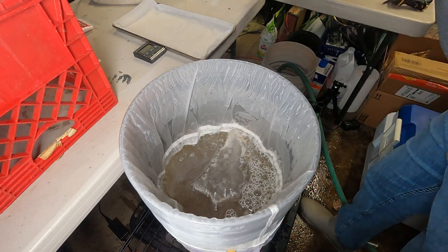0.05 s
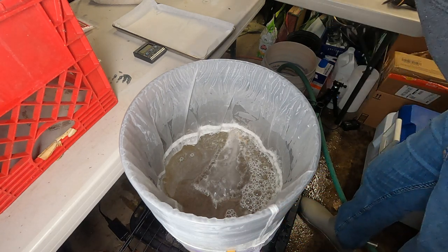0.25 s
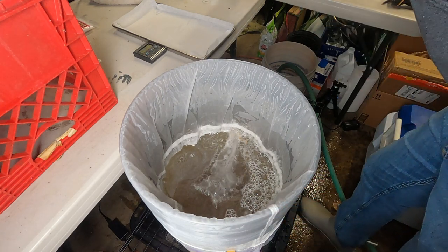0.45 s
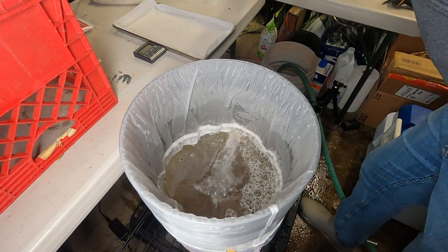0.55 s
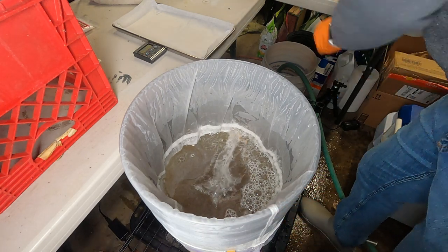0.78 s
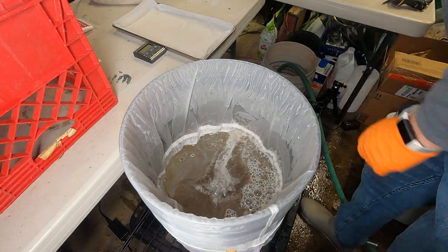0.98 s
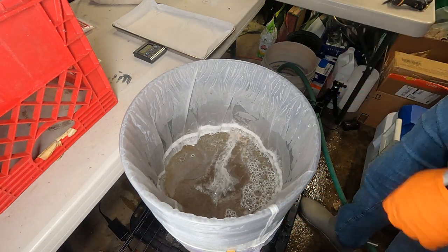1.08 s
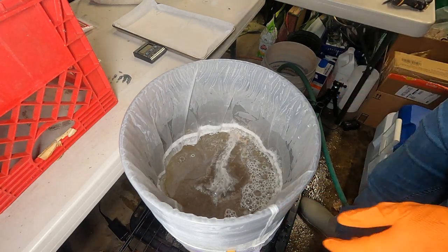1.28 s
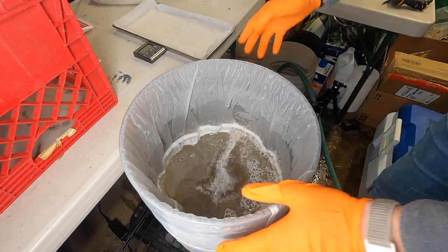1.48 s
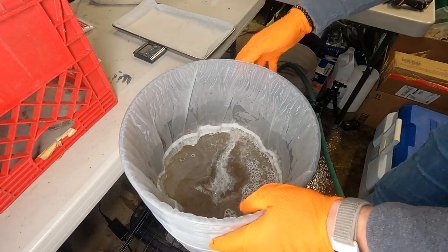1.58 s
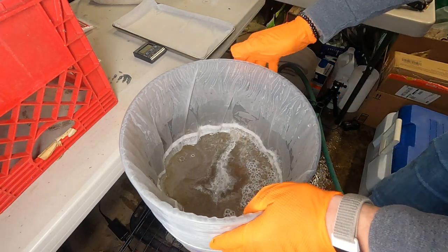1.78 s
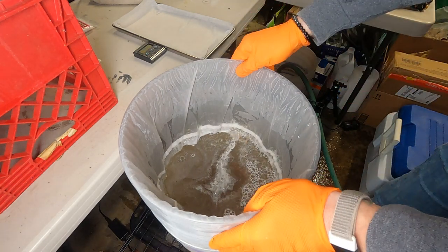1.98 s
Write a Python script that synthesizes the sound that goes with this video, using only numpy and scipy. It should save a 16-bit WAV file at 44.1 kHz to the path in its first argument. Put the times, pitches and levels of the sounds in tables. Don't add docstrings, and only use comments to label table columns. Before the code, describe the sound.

Water drips and drains through a mesh bag into a bucket: a few plinks and low glugs, one hollow bubbling slosh, then scattered bright drops over a faint trickle, heard close in a small shed.

```python
import sys
import numpy as np
from scipy import signal
from scipy.fft import rfft, irfft
from scipy.io import wavfile
from scipy.ndimage import uniform_filter1d

SR = 44100
rng = np.random.default_rng(int(sys.argv[2]) if len(sys.argv) > 2 else 0)


def convert_level_to_amplitude(level_db):
    exponent = np.asarray(level_db, float) / 20
    return 10 ** exponent


def digitize_waveform(pressure):
    field = np.atleast_2d(pressure).T
    bounded = np.clip(field, -1, 1)
    quanta = np.round(bounded * 32767).astype(np.int16)
    wavfile.write(sys.argv[1], SR, quanta)


N = 90404

# (frequency [Hz], level [dB per Hz])
AIR_SPECTRUM = [(30, 20), (110, -5.5), (400, 1.5), (2000, -6.5), (7000, -9.5), (13000, -20.5), (15600, -25),
                (16100, -48)]
AIR_DB, AIR_SIDE_DB = -68, -8.5
SETTLE_S, SETTLE_END_S, SETTLE_DB = 0.54, 1.206, -62
WALL_S, WALL_DB = 0.0068, -15
SHED_DB, SHED_T60_S, SHED_SIDE_GAIN = -6.5, 0.14, 0.24

# (frequency [Hz], level [dB per Hz])
TRICKLE_SPECTRUM = [(35, -78), (60, -39), (189, -0.5), (924, -2), (1620, 2.5), (4220, -16.5), (9790, -31.5),
                    (16000, -49.5)]
# (time [s], level [dB])
FLOW = [
    (0, -51.5),
    (.7, -57.5),
    (.95, -53),
    (1.3, -56),
    (1.45, -60),
    (1.75, -53.5),
    (2.05, -66),
]
HISS_DB, PATCH_DB, FLICKER_DB, FLICKER_HZ = -5, 2, 7.5, 7640
BEADS_PER_S, BEADS_DB, BEAD_SPREAD_DB = 400, -6, 2.5

# (frequency [Hz], level [dB per Hz])
CRACKLE_SPECTRUM = [(2500, 8.5), (5000, 2), (9000, -5.5), (15500, -17)]
CRACKLE_DB, CRACKLE_T60_S, CRACKLE_SHARE = -33.5, 0.078, 0.67

# (time [s], peak [dB], centre [Hz])
TICKS = [(.008, -37.5, 6930), (0.078, -45, 8340), (0.258, -36, 7270), (0.359, -46.5, 9250),
         (0.428, -38.5, 7600), (.458, -39, 6700), (0.491, -43, 9500), (0.559, -41, 8500),
         (0.56, -41, 10900), (0.612, -35.5, 10050), (0.612, -35.5, 13000), (0.618, -40, 6450),
         (.62, -53, 15000), (0.684, -44.5, 8470), (0.902, -38.5, 9100), (0.905, -52, 13500),
         (1.081, -63, 14400), (1.225, -61, 12000), (0.996, -54, 4400), (0.981, -44, 6600),
         (1.078, -45, 8700), (1.075, -39, 10830), (1.264, -41.5, 10550), (1.329, -45, 7020),
         (1.384, -43, 5880), (1.626, -43.5, 6600), (1.935, -47.5, 10250), (1.912, -48.5, 5550),
         (1.959, -44, 5200)]
TICK_T60_S, TICK_RISE_S, TICK_WIDTH, TICK_GRIT = 0.021, 0.003, 0.27, 0.45
# (time [s], peak [dB], pitch [Hz])
PIPS = [(0.818, -64, 7370), (0.828, -54, 7300), (.857, -64, 7190), (.903, -70, 13600), (0.911, -53, 7400),
        (1.038, -73, 7250), (1.04, -72, 10500), (1.129, -60, 7980), (1.224, -59, 7730), (1.245, -56, 7720),
        (1.301, -52.5, 4600), (1.329, -64.5, 12500), (1.369, -61, 7710), (1.41, -68, 10500),
        (1.459, -53.5, 5820), (1.46, -62, 12800), (1.474, -65, 9200), (1.517, -60, 7600),
        (1.523, -64, 9970), (1.556, -71, 12600), (1.643, -53, 7220), (1.675, -57, 8250), (1.811, -66, 7900),
        (1.871, -63, 6780)]
PIP_T60_S, PIP_SPREAD = 0.0095, 0.042
# (time [s], peak [dB], pitch [Hz])
THUDS = [
    (0.039, -37, 207),
    (1.645, -49.5, 265),
    (1.669, -52.5, 420),
    (1.933, -44, 608),
]
THUD_T60_S, THUD_RISE_S = 0.14, 0.0012

# (time [s], peak [dB], pitch [Hz], ring t60 [s])
GLUGS = [(0.039, -34.5, 787, 0.016), (0.113, -37.5, 859, 0.11), (0.2, -31.5, 595, 0.069),
         (0.213, -27.5, 647.5, 0.081), (0.832, -44, 840, 0.12), (0.845, -44, 876, 0.049),
         (1.084, -41, 760, 0.028), (1.137, -44.5, 640, 0.11), (1.166, -45.5, 668, 0.019),
         (1.27, -47.5, 940, 0.12), (1.647, -42, 425, 0.012)]
# (time [s], peak [dB], pitch [Hz], ring t60 [s])
PLINKS = [(0.0044, -39, 2210, 0.018), (0.0637, -45.5, 1720, 0.041), (0.1133, -35.5, 1870, 0.015),
          (0.7379, -40.5, 1383, 0.22), (0.7713, -29, 1382, 0.057), (0.8085, -38, 1720, 0.022),
          (0.828, -38, 1675, 0.039), (0.8948, -50.5, 1220, 0.2), (0.9079, -36, 2090, 0.0078),
          (1.0657, -34.5, 2370, 0.016), (1.0792, -36.5, 1550, 0.011), (1.1845, -33.5, 2046, 0.011),
          (1.3626, -47.5, 1563, 0.076), (1.495, -40, 2270, 0.0074), (1.517, -35, 1970, 0.0094),
          (1.5476, -41, 1430, 0.13), (1.5826, -37.5, 2140, 0.016), (1.6271, -35.5, 1570, 0.025),
          (1.6756, -36.5, 1503, 0.0076), (1.7757, -39.5, 2276, 0.057), (1.219, -45, 1590, 0.023),
          (1.737, -58.5, 1650, 0.026), (0.629, -50.5, 1455, 0.12), (1.812, -41.5, 1545, 0.03),
          (1.8697, -40.5, 2125, 0.013), (2.0156, -49.5, 1423, 0.029)]
# (time [s], peak [dB], pitch [Hz])
PINGS = [(0.741, -47.5, 2576), (0.786, -33.5, 3020), (0.854, -44, 3130), (1.036, -38, 2750),
         (1.1325, -36, 2720), (1.1853, -43, 2906), (1.417, -52, 2743), (1.517, -38.5, 3070),
         (1.5543, -42, 2990), (1.672, -50, 2845), (1.779, -40.5, 2850), (1.807, -39, 3110),
         (1.8698, -42.5, 2760), (1.913, -47.5, 2825), (2.026, -46.5, 2687)]
# (time [s], peak [dB], pitch [Hz])
SPITS = [(0.145, -32.5, 3420), (0.4549, -37, 3800), (0.5612, -34, 3540), (0.7856, -35.5, 3490),
         (0.828, -44.5, 4150), (0.904, -51, 3870), (0.9838, -39.5, 4320), (1.0375, -44, 4000),
         (1.066, -40, 4630), (1.189, -40.5, 3570), (1.2184, -33.5, 3870), (1.3447, -47.5, 4150),
         (1.4163, -45.5, 5110), (1.46, -49.5, 4070), (1.517, -45.5, 4080), (1.678, -45, 4120)]
PING_T60_S, SPIT_T60_S, SPIT_SPREAD = 0.032, 0.0056, 0.23
RISE_S, RISE_CYCLES, GLIDE_PER_S = 0.0014, 3.5, 1.14
KIN_DB, KIN_T60_S, KIN_SPREAD, KIN_LAG_S = -7, 0.016, 0.13, 0.002993
SPLASH_DB, SPLASH_T60_S, SPLASH_WIDTH = -15.5, 0.078, 0.63

# (time [s], pitch [Hz], level [dB])
GULP = [
    (1.932, 665, -30.5),
    (1.938, 360.5, -28),
    (1.972, 368.5, -38),
    (1.981, 365, -54.5),
    (1.997, 368, -46.5),
    (2.016, 480, -56),
    (2.043, 740, -42.5),
    (2.05, 770, -56),
]
GULP_THROB = 0.28
# (time [s], peak [dB], pitch [Hz])
BLOPS = [(0.221, -22, 633), (0.277, -20.5, 910), (0.302, -21.5, 770), (0.315, -21, 888),
         (0.353, -11.5, 818), (0.364, -13.5, 682), (0.375, -13, 567), (0.398, -10.5, 597),
         (0.413, -18, 543), (0.424, -11.5, 611), (0.442, -21, 668), (0.462, -18, 602), (0.504, -18, 796),
         (0.571, -32, 634)]
BLOP_DB, BLOP_T60_S = -4.5, 0.02

# (time [s], level [dB])
SLOSH = [
    (.14, -40),
    (.185, -46.5),
    (.22, -34),
    (.255, -37.5),
    (.34, -27),
    (.37, -25),
    (.44, -31),
    (.575, -34.5),
    (.6, -49),
    (.64, -51),
]
# (frequency [Hz], width [Hz], level [dB])
HOLLOW = [(159, 27, -16.5), (191, 61, -13), (333, 37, -5.5), (597, 116, 0), (814, 190, 2.5)]
# (frequency [Hz], level [dB per Hz])
CHURN_SPECTRUM = [(130, -28.5), (420, -11.5), (700, -6.5), (1150, -11), (1400, -27.5)]
# (frequency [Hz], level [dB per Hz])
FIZZ_SPECTRUM = [(1400, 2.5), (2600, 3), (3300, -8.5), (5200, -25)]
# (time [s], level [dB])
FROTH = [
    (.24, -60.5),
    (.27, -47.5),
    (.3, -45.5),
    (.31, -38),
    (.44, -40.5),
    (.455, -44.5),
    (.55, -48),
    (.59, -74),
]
# (frequency [Hz], level [dB per Hz])
SPRAY_SPECTRUM = [(5000, 14.5), (6500, 7), (13500, 7), (16000, -15)]
SLAPS_PER_S, SLAP_SPREAD_DB, HOLLOW_DB, CHURN_DB = 2500, 3.5, -2.5, -1.5
RUMBLE_SHARE, RUMBLE_DB = 0.32, -30
SWARM_PER_S, SWARM_SPREAD_DB = 4500, 3
SPRAY_S, SPRAY_PEAK_S, SPRAY_END_S, SPRAY_DB = 0.32, 0.54, 0.547, -55


def evened(x):
    return x / np.sqrt(np.mean(x ** 2) + 1e-20)


def read(points, hz):
    f, db = np.transpose(points)
    return np.interp(np.log(hz + 1), np.log(f + 1), db)


def curve(rows):
    s, db = np.transpose(rows)
    return convert_level_to_amplitude(np.interp(np.arange(N) / SR, s, db))


def add(mix, s, sound):
    part = mix[max(round(s * SR), 0):][:len(sound)]
    part += sound[:len(part)]


def resonate(x, hz, width_hz, order=1):
    turn = np.exp(2j * np.pi * hz * np.arange(len(x)) / SR)
    r = np.exp(-np.pi * width_hz / SR)
    low = x / turn
    for _ in range(order):
        low = signal.lfilter([1 - r], [1, -r], low)
    return 2 * (turn * low).real


def bubble(hz, t60):
    t = np.arange(0, t60 + .02, 1 / SR)
    swell = np.sin(np.pi / 2 * np.minimum(t / (RISE_S + RISE_CYCLES / hz), 1)) ** 2
    ring = swell * convert_level_to_amplitude(-60 * t / t60)
    return ring / ring.max() * np.sin(2 * np.pi * hz * (t + GLIDE_PER_S * t ** 2 / 2))


def swarm(per_s, spread_db, points, cycles, base_s):
    hit = rng.random(N) < per_s / SR
    size = convert_level_to_amplitude(spread_db * np.minimum(rng.exponential(1, N), 3)) * hit
    kind, out = rng.integers(0, 24, N), np.zeros(N)
    for k, hz in enumerate(np.geomspace(points[0][0], points[-1][0], num=24)):
        grain = bubble(hz, base_s + cycles / hz)
        grain = convert_level_to_amplitude(read(points, hz)) * np.sqrt(hz) * grain / np.linalg.norm(grain)
        out += signal.oaconvolve(size * (kind == k), grain)[:N]
    return evened(out)


def puff(db, hz, width, order, t60, rise_s, power=1, grit=0):
    t = np.arange(4096) / SR
    noise = rng.standard_normal(4096)
    if grit:
        noise *= np.exp(grit * evened(uniform_filter1d(rng.standard_normal(4096), 60)))
    band = evened(resonate(noise, hz, width * hz, order))
    return convert_level_to_amplitude(db - 60 * t / t60) * np.minimum(t / rise_s, 1) ** power * band


def air():
    tone = convert_level_to_amplitude(read(AIR_SPECTRUM, np.fft.rfftfreq(N, 1 / SR)))
    mid, side = irfft(rfft(rng.standard_normal((2, N))) * tone, N)
    return convert_level_to_amplitude(AIR_DB) * (evened(mid) + convert_level_to_amplitude(AIR_SIDE_DB) * np.outer([1, -1], evened(side)))


def settling():
    t = np.arange(N) / SR
    fade = np.clip(np.minimum(t - SETTLE_S, SETTLE_END_S - t) / 0.097 + 1, 0, 1)
    return convert_level_to_amplitude(SETTLE_DB) * fade * evened(resonate(rng.standard_normal(N), 530, 940, order=2))


def shed(x):
    taps = np.zeros((2, 12000))
    at = np.arange(100, 11900, 20) + rng.integers(0, 20, (2, 590))
    np.put_along_axis(taps, at, rng.choice([-1., 1.], at.shape), 1)
    taps *= convert_level_to_amplitude(-60 * np.arange(12000) / SR / SHED_T60_S)
    taps *= convert_level_to_amplitude(SHED_DB) / np.linalg.norm(taps[0])
    taps[0, round(WALL_S * SR)] += convert_level_to_amplitude(WALL_DB)
    mid, side = signal.fftconvolve(x[None], taps, axes=1)[:, :N]
    side = SHED_SIDE_GAIN * signal.lfilter(*signal.butter(1, 9000, "high", fs=SR), side)
    return np.array([mid + side, mid - side])


def trickle_hiss():
    frames, hz = N // 128 + 5, np.fft.rfftfreq(512, 1 / SR)
    a, b, patches = rng.standard_normal((3, 257, frames))
    patches = evened(uniform_filter1d(uniform_filter1d(patches, 8, 0), 10, 1))
    flicker = evened(uniform_filter1d(rng.exponential(1, frames) - 1, size=2))
    flicker = FLICKER_DB * flicker * np.sqrt(hz / FLICKER_HZ)[:, None]
    z = (a + 1j * b) * convert_level_to_amplitude(read(TRICKLE_SPECTRUM, hz)[:, None] + PATCH_DB * patches + flicker)
    hiss = evened(signal.istft(z, nperseg=512, noverlap=384)[1][:N])
    return curve(FLOW) * convert_level_to_amplitude(HISS_DB) * hiss


def trickle_beads():
    beads = swarm(BEADS_PER_S, BEAD_SPREAD_DB, TRICKLE_SPECTRUM[3:], 12.6, 0.0054)
    return curve(FLOW) * convert_level_to_amplitude(BEADS_DB) * beads


def crackle():
    kicks, t = np.zeros(N), np.arange(8192) / SR
    for s, db, _ in (*TICKS, *PIPS, *SPITS, *PINGS):
        add(kicks, s, convert_level_to_amplitude(CRACKLE_SHARE * db - 60 * t / CRACKLE_T60_S) ** 2)
    return convert_level_to_amplitude(CRACKLE_DB) * np.sqrt(kicks) * swarm(9000, 5.6, CRACKLE_SPECTRUM, 14, 0.0021)


def mesh_ticks():
    out = np.zeros(N)
    for s, db, hz in TICKS:
        sound = puff(db, hz, TICK_WIDTH, 4, TICK_T60_S, TICK_RISE_S, power=2, grit=TICK_GRIT)
        add(out, s - TICK_RISE_S / 2, sound)
    return out


def mesh_pips():
    out = np.zeros(N)
    for s, db, hz in PIPS:
        for size, lag in rng.uniform(-1, 1, (3, 2)):
            sound = convert_level_to_amplitude(db) * bubble(hz * (1 + PIP_SPREAD * size), PIP_T60_S)
            add(out, s - RISE_S + KIN_LAG_S * abs(lag), sound)
    return out


def wall_thuds():
    out = np.zeros(N)
    for s, db, hz in THUDS:
        add(out, s, puff(db, hz, 1.35, 4, THUD_T60_S, THUD_RISE_S))
    return out


def drop_splashes():
    out = np.zeros(N)
    for s, db, hz, *_ in (*PLINKS, *SPITS, *PINGS):
        add(out, s, puff(db + SPLASH_DB, hz, SPLASH_WIDTH, 3, SPLASH_T60_S, TICK_RISE_S))
    return out


def drops():
    rows = [(*row, KIN_SPREAD) for row in (*GLUGS, *PLINKS)]
    rows += [(*row, PING_T60_S, KIN_SPREAD) for row in PINGS]
    rows += [(*row, SPIT_T60_S, SPIT_SPREAD) for row in SPITS]
    out = np.zeros(N)
    for s, db, hz, t60, spread in rows:
        add(out, s - RISE_S - 1 / hz, convert_level_to_amplitude(db) * bubble(hz, t60))
        for size, lag in rng.uniform(-1, 1, (4, 2)):
            sound = convert_level_to_amplitude(db + KIN_DB) * bubble(hz * (1 + spread * size), min(t60, KIN_T60_S))
            add(out, s + KIN_LAG_S * abs(lag), sound)
    return out


def gulp():
    s, hz, db = np.transpose(GULP)
    t, out = np.arange(s[0], s[-1], 1 / SR), np.zeros(N)
    wobble = uniform_filter1d(uniform_filter1d(rng.standard_normal(len(t)), 150), 150)
    throb = np.exp(GULP_THROB * evened(wobble))
    level = np.minimum((t - s[0]) / RISE_S, 1) * throb * convert_level_to_amplitude(np.interp(t, s, db))
    phase = 2 * np.pi * np.cumsum(np.interp(t, s, hz)) / SR
    add(out, s[0], level * np.sin(phase))
    return out


def blops():
    out = np.zeros(N)
    for s, db, hz in BLOPS:
        add(out, s - 1 / hz, convert_level_to_amplitude(db + BLOP_DB) * bubble(hz, BLOP_T60_S))
    return out


def spray():
    swell = np.interp(np.arange(N) / SR, (SPRAY_S, SPRAY_PEAK_S, SPRAY_END_S), (0, 1, 0))
    return convert_level_to_amplitude(SPRAY_DB) * swell * swarm(SWARM_PER_S, SWARM_SPREAD_DB, SPRAY_SPECTRUM, 42, 0.003)


def slosh():
    t, push = np.arange(N) / SR, rng.standard_normal(N)
    churn = swarm(SLAPS_PER_S, SLAP_SPREAD_DB, CHURN_SPECTRUM, 6.7, 0.01)
    hollow = sum(convert_level_to_amplitude(db) * evened(resonate(push, hz, width_hz, order=2)) for hz, width_hz, db in HOLLOW)
    body = convert_level_to_amplitude(HOLLOW_DB) * evened(hollow) + convert_level_to_amplitude(CHURN_DB) * churn
    strength = curve(SLOSH)
    rumble = convert_level_to_amplitude(RUMBLE_DB) * evened(resonate(push[::-1], 200, 135, order=3))
    fizz = swarm(SWARM_PER_S, SWARM_SPREAD_DB, FIZZ_SPECTRUM, 31, 0.0059) * curve(FROTH)
    ends = np.clip(np.minimum(t - SLOSH[0][0], SLOSH[-1][0] - t) / 0.046, 0, 1)
    return (body * strength + rumble * strength ** RUMBLE_SHARE + fizz) * ends


def scene():
    background = air() + settling() + trickle_hiss()
    mesh = mesh_ticks() + mesh_pips() + crackle()
    near = trickle_beads() + mesh + wall_thuds() + drop_splashes() + drops() + blops()
    surge = slosh() + spray()
    return background + near + gulp() + surge + shed(near + convert_level_to_amplitude(-3.0) * surge)


def roll_off(x):
    return signal.sosfilt(signal.butter(12, 16500, fs=SR, output="sos"), x)


def record(dry):
    thin = signal.sosfilt(signal.butter(4, 118, "high", fs=SR, output="sos"), dry)
    lowpass = signal.firwin(511, 16350, window=("kaiser", 9), fs=SR)
    cut = signal.oaconvolve(thin, lowpass[None], "same")
    return roll_off(cut)


dry = scene()
out = record(dry)
digitize_waveform(out)
```